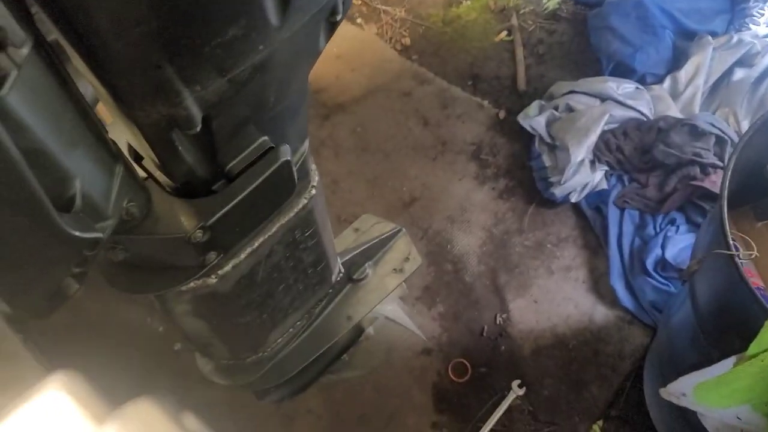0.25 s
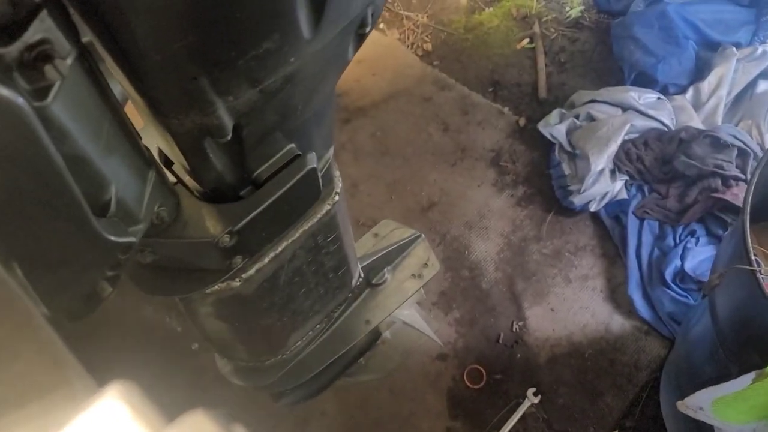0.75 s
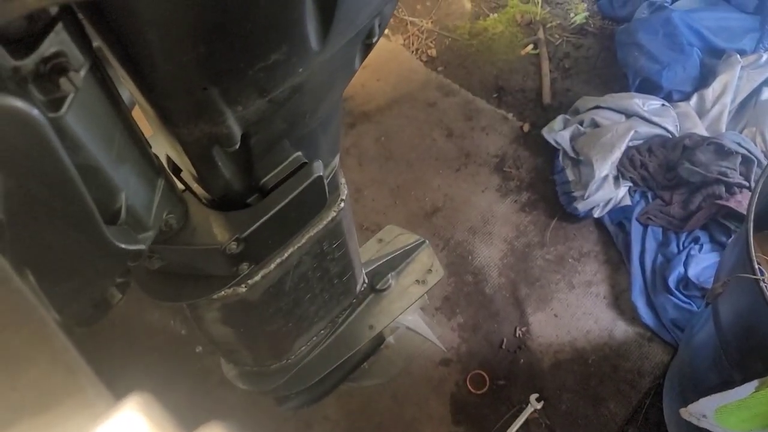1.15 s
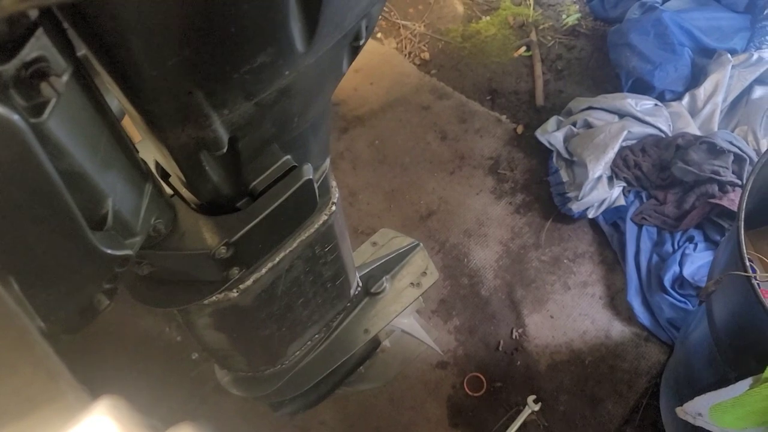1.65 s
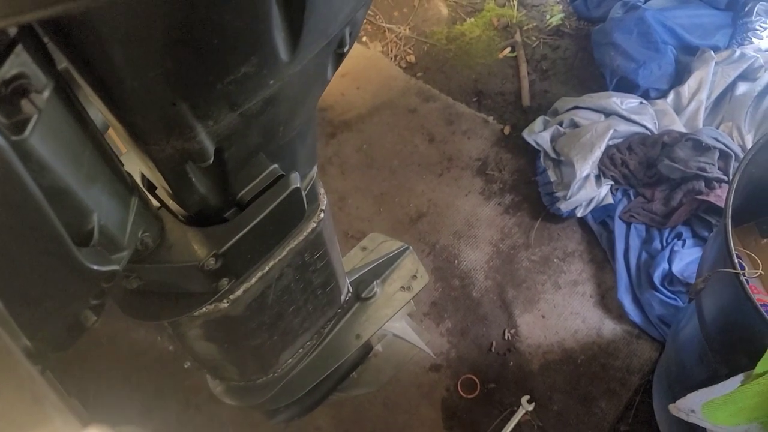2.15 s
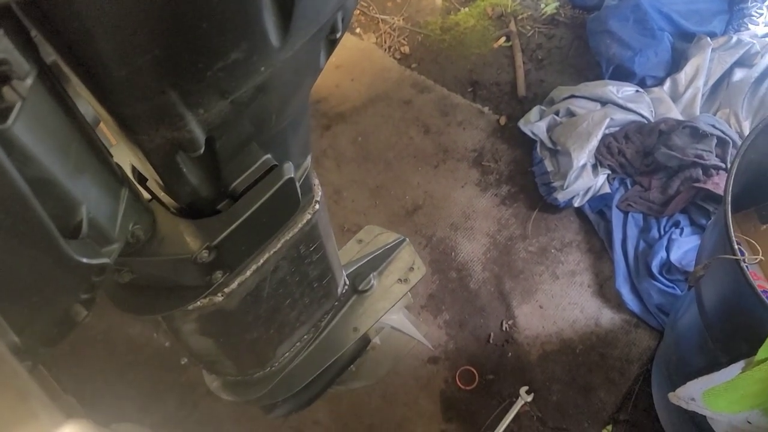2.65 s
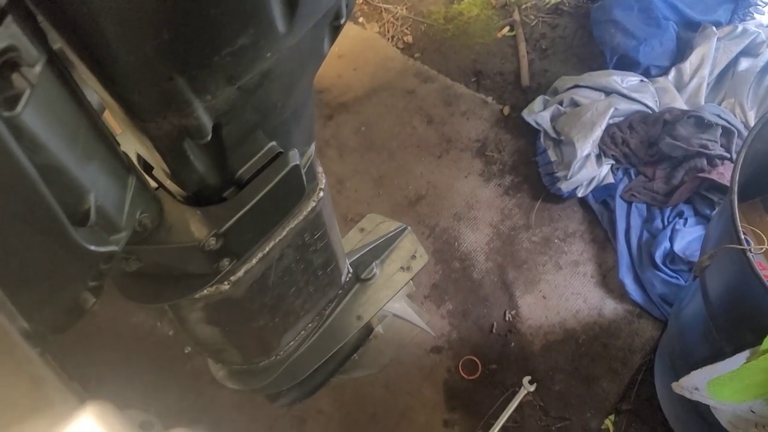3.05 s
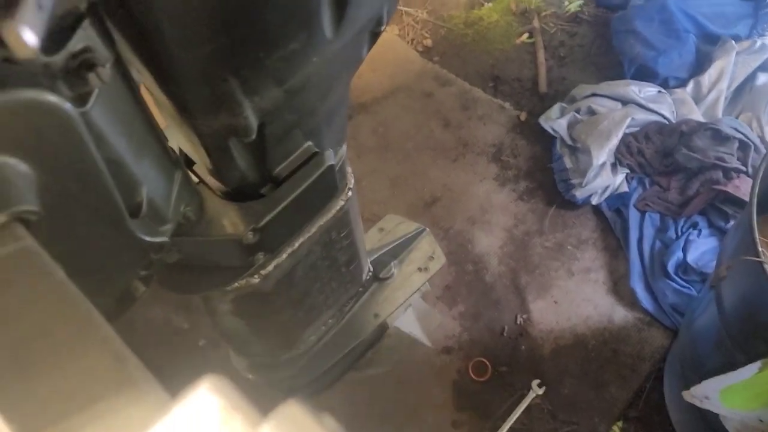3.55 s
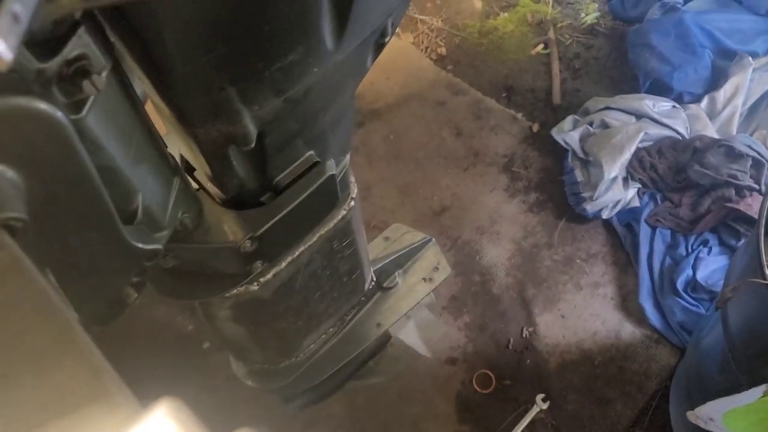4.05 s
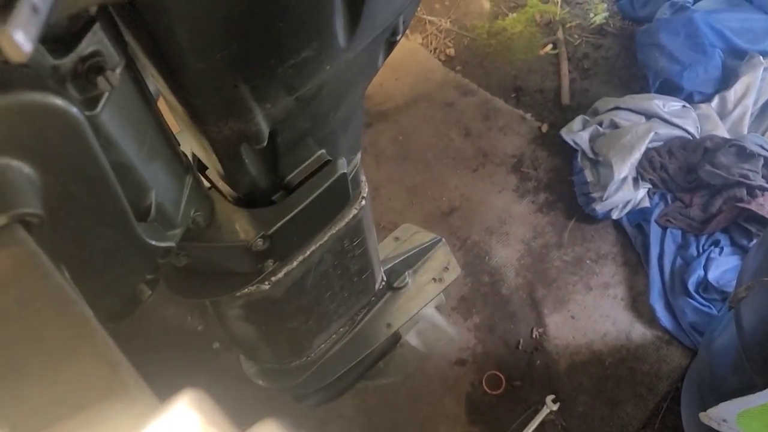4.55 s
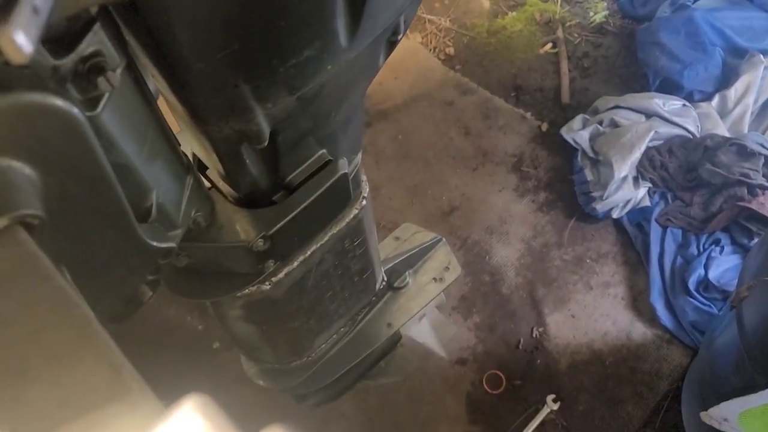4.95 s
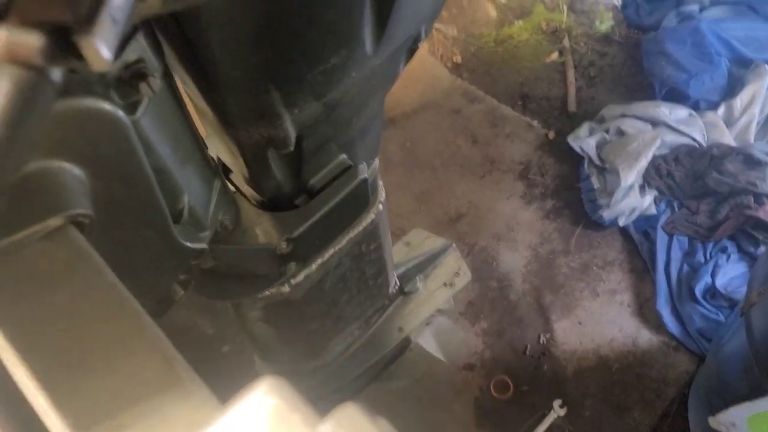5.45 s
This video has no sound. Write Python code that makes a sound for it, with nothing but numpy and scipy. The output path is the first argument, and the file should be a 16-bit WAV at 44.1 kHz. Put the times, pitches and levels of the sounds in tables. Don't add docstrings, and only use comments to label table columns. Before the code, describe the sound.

Quiet open shed with echoing birdsong; after two seconds starter gears grind, a small outboard engine fires, surges and runs on unevenly.

```python
import sys
import numpy as np
from scipy import signal
from scipy.fft import rfft, irfft, next_fast_len
from scipy.io import wavfile
from scipy.ndimage import uniform_filter1d

SR = 44100
rng = np.random.default_rng(int(sys.argv[2]) if len(sys.argv) > 2 else 0)


def pcm_store(signal):
    levels = np.round(np.clip(np.atleast_2d(signal), -1, 1) * 32767)
    wavfile.write(sys.argv[1], SR, levels.astype(np.int16).T)


def elevation(decibels):
    levels = np.asarray(decibels, float)
    return 10 ** (levels / 20)


N = 250929

# time in seconds, firing slots per second.
SHAFT_SPEED = [(2.287, 7.93), (2.4, 9.64), (2.78, 10.6), (2.84, 12.98), (2.97, 19.66), (3.13, 31.68),
               (3.32, 40.3), (3.44, 43.82), (3.8, 47.66), (4.0, 48.64), (4.5, 48.35), (4.65, 47.09),
               (4.95, 46.02), (5.1, 46.76), (5.25, 46.64), (5.6, 43.63), (5.69, 48.8)]
MISSES = [
    (65, 65, .55),
    (69, 77, .2),
    (87, 103, .2),
    (107, 107, .6),
    (111, 127, .2),
    (128, 128, .45),
]
# level while cranking in dB, settled level in dB, surge adds in dB, settling adds in dB.
BLOW_LEVELS = (-26, -27.5, -3, 2)
PIPE_LEVELS = (-30, -23.5, 1, 3.5)
GAS_LEVELS = (-42, -37, 8, 2)
METAL_LEVELS = (-34, -24.5, 0.5, 4.5)
# frequency in Hz, width in Hz, level in dB.
PASSAGE_MODES = [(461, 47, -2.5), (582, 37, -5), (882.6, 46, 5), (1298, 68, 5.5), (1545, 120, -1),
                 (1880, 21, 0)]
# frequency in Hz, width in Hz, level in dB.
COWL_MODES = [(838, 183, -14), (1300, 127, -3), (1582, 34, 3.5), (1896, 210, -0.5), (2820, 180, -64),
              (3360, 100, -1), (4860, 60, -3), (5300, 120, -1.5), (6200, 100, -4.5)]
# frequency in Hz, density in dB per Hz.
GAS_COLOUR = [(300, 0.5), (1000, -3), (3000, -6), (6000, -9.5), (8000, -13), (13000, -13.5), (16000, -14.5)]
# frequency in Hz, density in dB per Hz.
CLATTER_COLOUR = [(180, 19), (300, -2), (354, 9), (470, -4), (667, -17.5), (899, -15), (1120, -30),
                  (1320, -1.5), (1480, -24), (4900, -30), (16000, -56)]
# frequency in Hz, width in Hz, level in dB.
MESH_MODES = [(427, 120, -6), (880, 47, 2), (1290, 90, -13), (1700, 230, 0.5), (2720, 200, -1),
              (5120, 120, -16)]
# frequency in Hz, width in Hz, level in dB.
HOUSING_MODES = [(914, 77, -7), (1290, 63, 12), (1645, 56, 7.5), (1975, 74, 3.5), (2254, 140, -5),
                 (2824, 170, 2.5), (3720, 79, -9), (4015, 56, 4.5), (5160, 34, 5), (6410, 220, 4.5),
                 (8400, 190, -1), (8600, 75, -18.5)]
# frequency in Hz, density in dB per Hz.
GRIND_COLOUR = [(120, -10), (200, 0.5), (568, -10), (883, -9), (1120, -16), (2700, -9), (4510, -20),
                (5030, -16.5), (7670, -29.5), (12800, -32), (16000, -41)]
# start in seconds, level in dB, ring in Hz, length in seconds.
PINION_KNOCKS = [(2.058, -7.5, 362, 0.025), (2.062, -8, 231, 0.021), (2.086, -5, 225, 0.0163),
                 (2.118, -11, 1237, 0.031), (2.165, -11.5, 366, 0.0244), (2.188, -5, 247, 0.035),
                 (2.246, -14, 172, 0.012), (2.3, -16.5, 1602, 0.032), (2.338, -16.5, 1290, 0.025),
                 (2.063, -16.5, 441, 0.053), (2.066, -24, 584, 0.031), (2.085, -18, 93, 0.031),
                 (2.126, -16.5, 838, 0.046), (2.946, -17.5, 1200, 0.022), (2.983, -17.5, 1300, 0.028)]
# time in seconds, pitch in Hz, level in dB.
OPENING_NOTES = [
    [(.57, 7140, -78), (.6, 7500, -80), (.72, 7360, -82)],
    [(.6, 5940, -87), (.7, 6100, -80)],
    [(.855, 3000, -59), (.88, 3060, -45.5), (.915, 3170, -54), (.92, 3150, -65)],
    [(.896, 3290, -60), (.906, 4590, -60), (.915, 4250, -52), (.925, 3600, -47.5), (.95, 3190, -43.5),
     (.975, 2380, -59)],
    [(.985, 3560, -57), (1.06, 3660, -52.5), (1.15, 4060, -49), (1.24, 4104, -55.5), (1.33, 4050, -74)],
    [(1.635, 3320, -53), (1.66, 3500, -52), (1.675, 2990, -43), (1.71, 2320, -81)],
]
# time from its start in seconds, pitch in Hz, level in dB.
FALLING_NOTE = [(0, 6900, -69), (.03, 5920, -58), (.07, 5030, -50.5), (.095, 3850, -49), (.102, 3610, -56)]
# time from its start in seconds, pitch in Hz, level in dB.
LIFTING_NOTE = [(0.108, 2670, -65), (0.124, 3116, -45), (.15, 3200, -73), (0.221, 3270, -68)]
PHRASE_STARTS_S = [1.299, 1.471, 1.64, 1.818, 1.996]
# start in seconds, length in seconds, frequency in Hz, width in Hz, level in dB.
TWITTER = [
    (0, 0.021, 3150, 714, -54),
    (0.695, 0.14, 5800, 1500, -64),
    (0.712, 0.055, 4200, 1200, -63),
    (1.51, .015, 1700, 600, -63),
]
# frequency in Hz, density in dB per Hz.
YARD_COLOUR = [(12, -56), (20, -34), (54, 5.5), (76, 7), (97, -21), (133, -10), (162, -48), (198, -16.5),
               (293, -18), (414, -13), (570, -27.5), (729, -18.5), (7200, -46), (9360, -79), (15800, -120)]
# frequency in Hz, width in Hz, level in dB.
MACHINE_HUM = [(63.7, 2.7, -53.5), (129.3, 2.4, -58), (205, 32, -60)]
# frequency in Hz, left-right likeness (0-1).
PORT_LIKENESS = [(60, 0.83), (130, 1), (290, 0.55), (640, 0.46), (1410, 0.61), (3100, 0.43), (6820, 0.15),
                 (15000, 0.18)]
# frequency in Hz, left minus right in dB.
PORT_BALANCE = [(60, -2), (130, 1), (290, -0.5), (640, 4), (1410, -1), (3100, -2.5), (6820, 4), (15000, 6)]
# frequency in Hz, lead of the left port in radians.
PORT_LEAD = [(60, 0.05), (200, 0.4), (430, 1.9), (1400, 2.29), (3000, 1.99), (15000, 1.87)]

FIRST_FIRING_SLOT = 6
CATCH_S, SURGE_S, SETTLE_S = 2.86, 0.28, 0.85
ENGAGE_S, STALL_S, RUNDOWN_S = 2.04, 2.24, 3.0


def evened(x):
    return x / np.sqrt(np.mean(x ** 2) + 1e-20)


def read(points, hz):
    f, value = np.transpose(points)
    return np.interp(np.log(hz + 1), np.log(f + 1), value)


def add(mix, start_s, sound):
    part = mix[round(start_s * SR):][:len(sound)]
    part += sound[:len(part)]


def resonate(x, hz, width_hz):
    return signal.lfilter(*signal.iirpeak(hz, hz / width_hz, SR), x)


def ring(x, modes):
    return sum((-1) ** k * elevation(db) * resonate(x, hz, w) for k, (hz, w, db) in enumerate(modes))


def swing(t, delay_s, hz, t60_s):
    u = np.maximum(t - delay_s, 0)
    return -np.sin(2 * np.pi * hz * u) * elevation(-60 * u / t60_s)


def packet(t, start_s, length_s, hz):
    u = np.clip((t - start_s) / length_s, 0, 1)
    return np.sin(np.pi * u ** 1.2) ** 1.2 * np.sin(2 * np.pi * hz * (t - start_s))


def bump(t, at_s, width_s):
    return np.exp(-((t - at_s) / width_s) ** 2)


def noise(colour, patchy_db):
    hz = np.fft.rfftfreq(1024, 1 / SR)
    a, b, c, d, patches = rng.standard_normal((N // 256 + 5, 513, 5)).T
    patches = uniform_filter1d(patches, size=10, axis=0)
    patches = evened(uniform_filter1d(patches, size=8, axis=1))
    same = np.clip(read(PORT_LIKENESS, hz), -1, 1)[:, None]
    left = a + 1j * b
    lag = np.exp(-1j * read(PORT_LEAD, hz))[:, None]
    right = same * left * lag + np.sqrt(1 - same ** 2) * (c + 1j * d)
    z = np.array([left, right]) * elevation(read(colour, hz)[:, None] + patchy_db * patches)
    return evened(signal.istft(z, nperseg=1024, noverlap=768)[1][:, :N])


def shed(x, t60_s, gap_s):
    t = np.arange(SR // 2) / SR
    tail = rng.standard_normal((2, len(t))) * elevation(-60 * t / t60_s) * (t > gap_s)
    tail = signal.lfilter(*signal.butter(2, 260, "high", fs=SR), tail / np.linalg.norm(tail[0]))
    return signal.fftconvolve(np.atleast_2d(x), tail, axes=1)[:, :N]


def slot_rate():
    s, rate = np.transpose(SHAFT_SPEED)
    return np.interp(np.arange(N) / SR, s, rate)


def shaft():
    return np.cumsum(slot_rate() * (np.arange(N) >= SHAFT_SPEED[0][0] * SR)) / SR


def firings():
    at = np.flatnonzero(np.diff(np.floor(shaft()), prepend=0) > 0)
    at = np.r_[round(SHAFT_SPEED[0][0] * SR), at]
    luck = rng.standard_normal((len(at), 3))
    share = np.ones(len(at))
    for first, last, part in MISSES:
        share[first:last + 1:4] = part
    share[1:] *= elevation(1.5 * (2.0 - share[:-1]))
    fired = np.arange(len(at)) >= FIRST_FIRING_SLOT
    slow = 46 / slot_rate()[at]
    return at, fired, share, slow, luck


def engine_levels():
    since = np.arange(N) / SR - CATCH_S
    surge, settle = np.exp(-(since / SURGE_S) ** 4), np.exp(-since.clip(0) / SETTLE_S)
    blow_db, pipe_db, gas_db, metal_db = (
        np.where(since < 0, crank, run + a * surge + b * settle)
        for crank, run, a, b in (BLOW_LEVELS, PIPE_LEVELS, GAS_LEVELS, METAL_LEVELS))
    tuned = bump(slot_rate(), 38, 7)
    return blow_db, pipe_db + 3 * tuned, gas_db, metal_db


def engine():
    at, fired, share, slow, luck = firings()
    blow_db, pipe_db, gas_db, metal_db = engine_levels()
    lead, t = 600, np.arange(3500) / SR
    u = t - lead / SR + np.array([[0], [-.0005]])
    power = fired * share

    def played(size, shape):
        train = np.zeros(N + lead)
        train[at - lead] = size
        return signal.oaconvolve(train[None], np.atleast_2d(shape), axes=1)[:, :N]

    blow = swing(u, -.0016, 160, .035) - .8 * bump(u, 0, .0006)
    blow = blow + .4 * bump(u, -.003, .001)
    chuff = swing(u, -0.0057, 107.3, 0.13) + 1.14 * bump(u, -0.012, 0.0017)
    out = elevation(blow_db + 19.5) * (played(power * elevation(.6 * luck[:, 0]), blow) + played(0.69 * ~fired, chuff))
    missed = 0.29 * fired * np.maximum(1 - share, 0)
    out += elevation(blow_db + 42) * played(missed, swing(u, 0.02314, 72, 0.019))
    out += elevation(blow_db + 3.0) * played(power * slow ** 2.25, swing(u, -0.0018, 92, 0.085))
    swells = bump(u, -0.0036, 0.00061) + 1.2 * bump(u, .0045, 0.0012) + .6 * bump(u, 0, 0.00084)
    out += elevation(blow_db + 17) * played(fired * (slow - 1).clip(0, .9), swells)

    pipe = np.array([packet(u[0], .0025, 0.014, 273), 1.165 * packet(u[1], 0.0028, 0.022, 279)])
    out += elevation(pipe_db + 10) * played(fired * share ** .6 * elevation(.7 * luck[:, 1]), pipe)
    turn = (-1.) ** np.arange(len(at))
    unequal = packet(u, 0.00576, 0.018, 272.5) + 0.35 * packet(u, 0.00364, 0.013, 503)
    out += elevation(pipe_db + 2) * played(power * turn, unequal)
    out += elevation(pipe_db - 3) * played(power, swing(u, 0.01779, 253, 0.12))
    out += elevation(pipe_db + 7.0) * played(fired * (slow - 1).clip(0, .7), packet(u, 0.01654, 0.034, 258.6))

    front = bump(u[0], np.array([[-.0015], [-.0012]]), .00008)
    fronts = played(power / slow ** .4 * elevation(1.1 * luck[:, 0]), front)
    out += elevation(-23.5) * evened(ring(fronts, PASSAGE_MODES))

    tick = rng.standard_normal((2, len(t))) * elevation(-60 * abs(u) / 0.09)
    ticks = played(power * elevation(2.5 * luck[:, 1]), tick)
    out += elevation(metal_db - 9.0) * evened(ring(ticks, COWL_MODES))

    uneven_db = -4 * turn * np.clip(1 - (np.arange(len(at)) - 6) / 25, .2, 1)
    puff = (u > -.003) * elevation(-60 * np.maximum(u - .004, 0) / 0.086)
    gas = noise(GAS_COLOUR, patchy_db=2.0)
    gate = played(power * elevation(uneven_db + 3.9 * luck[:, 2]), puff)
    slots = shaft()
    out += elevation(gas_db + 8.5) * gas * (gate + 0.076 * (slots > 0))

    rattle = noise(CLATTER_COLOUR, patchy_db=2.5)
    rattle = rattle - .55 * signal.lfilter(*signal.butter(1, 1500, fs=SR), rattle)
    rattle = signal.lfilter(*signal.butter(3, 620, "high", fs=SR), rattle)
    metal = evened(rattle + 1.63 * ring(rattle, COWL_MODES))
    out += elevation(metal_db - 2.5) * metal * (1.15 + 0.43 * gate) * (slots > FIRST_FIRING_SLOT)
    return out


def starter_drive():
    t = np.arange(N) / SR
    on, down = (t - ENGAGE_S).clip(0), (t - RUNDOWN_S).clip(0)
    attack_s, jolt_s, sag_s = 0.011, 0.024, 0.022
    level_db = -20 + 8.5 * np.exp(-(on - attack_s).clip(0) / jolt_s) - 30 * (1 - on / attack_s).clip(0)
    level_db = level_db - 13.5 * (t < STALL_S) * np.exp(-(STALL_S - t).clip(0) / sag_s)
    level_db = level_db - 10 * ((t - CATCH_S) / 0.037).clip(0, 1) - 280 * down
    teeth_per_slot, free_hz, first_heave_hz = 87, 878, 445.6
    turning_hz = np.minimum(teeth_per_slot * slot_rate(), free_hz) - 1800 * down
    mesh_hz = np.where(t < STALL_S, first_heave_hz, turning_hz.clip(100))
    dull = 0.29
    return level_db, mesh_hz, dull + (1 - dull) * ((t - STALL_S) / 0.066).clip(0, 1)


def starter():
    level_db, mesh_hz, bright = starter_drive()
    stroke = (shaft() + 0.15) % 1
    load = elevation(-2.5 - 7.7 * stroke ** 4.6)
    spring = bump(stroke, .65, 0.075)
    teeth = np.cumsum(mesh_hz * (1 + .05 * np.cos(2 * np.pi * (stroke - .7)))) / SR
    clicks = (np.diff(np.floor(teeth), prepend=0) > 0) * elevation(2.2 * rng.standard_normal(N))
    whine = evened(ring(clicks, MESH_MODES)) * np.array([[1], [.4]])
    grind = noise(GRIND_COLOUR, patchy_db=2.5)
    grind = evened(ring(grind, HOUSING_MODES)) * 3.21 + 2.64 * grind
    dull = signal.lfilter(*signal.butter(1, 3000, fs=SR), grind)
    gears = load * (dull + np.clip(bright, 0, 1) * (grind - dull)) * (1 + 0.44 * spring)
    gears = gears + (0.12 + 1.68 * spring * np.clip(mesh_hz / 880, 0, 1) ** 4) * whine
    running = np.arange(N) > ENGAGE_S * SR
    return elevation(level_db - 3.0) * gears * running + pinion()


def pinion():
    knocks = np.zeros(N)
    for s, db, hz, length_s in PINION_KNOCKS:
        add(knocks, s, elevation(db) * packet(np.arange(0, length_s, 1 / SR), 0, length_s, hz))
    return knocks + .5 * shed(knocks, 0.1, 0.00034)


def birds():
    song = np.zeros(N)
    flutter = evened(signal.lfilter(*signal.butter(3, 260, fs=SR), rng.standard_normal(SR)))
    phrases = [np.add(note, [s, 0, 0]) for s in PHRASE_STARTS_S for note in (FALLING_NOTE, LIFTING_NOTE)]
    for note in OPENING_NOTES + phrases:
        s, hz, db = np.transpose(note)
        t = np.arange(s[0], s[-1], 1 / SR)
        rasp = .25 + .55 * min(len(t) / SR / .25, 1) ** 2
        tone = np.sin(2 * np.pi * np.cumsum(np.interp(t, s, hz)) / SR) * elevation(np.interp(t, s, db) + 4.0)
        add(song, s[0], tone * (1 + rasp * flutter[:len(t)]) * signal.windows.tukey(len(t), .2))
    for s, length_s, hz, width_hz, db in TWITTER:
        fuzz = rng.standard_normal(round(length_s * SR))
        fuzz = resonate(resonate(fuzz, hz, width_hz), hz, width_hz)
        add(song, s, elevation(db) * evened(fuzz) * np.hanning(len(fuzz)))
    return 0.61 * song + 1.06 * shed(song, 0.46, 0.00077)


def yard():
    hum = sum(elevation(db) * evened(resonate(rng.standard_normal(N), hz, w)) for hz, w, db in MACHINE_HUM)
    add(hum, .805, elevation(-45) * packet(np.arange(0, .05, 1 / SR), 0, 0.032, 310))
    return elevation(-50.5) * noise(YARD_COLOUR, patchy_db=-2.5) + hum


def scene():
    motor = engine() + starter()
    room = elevation(-16) * shed(motor, .25, .008)
    far = signal.sosfilt(signal.butter(12, 7300, fs=SR, output="sos"), birds() + yard())
    return motor + room + far


def low_pass(x):
    return signal.sosfilt(signal.butter(12, 16120, fs=SR, output="sos"), x)


def record(dry):
    size = next_fast_len(N)
    hz = np.fft.rfftfreq(size, 1 / SR)
    lean_db = read(PORT_BALANCE, hz) / 2
    bass_cut = hz ** 3 / np.hypot(hz ** 3, 50.5 ** 3)
    ports = irfft(rfft(dry, size) * elevation([lean_db, -lean_db]) * bass_cut, size)[:, :N]
    ports = ports + elevation(-91) * rng.standard_normal((2, N))
    limited = 1.05 * np.tanh(ports / 1.05)
    limited = signal.sosfiltfilt(signal.butter(10, 16200, fs=SR, output="sos"), limited)
    return low_pass(limited)


dry = scene()
out = record(dry)
pcm_store(out)
```